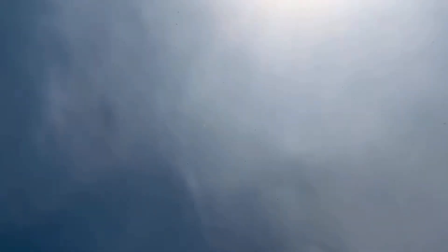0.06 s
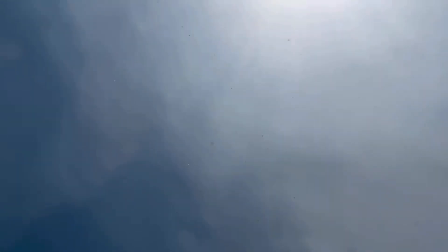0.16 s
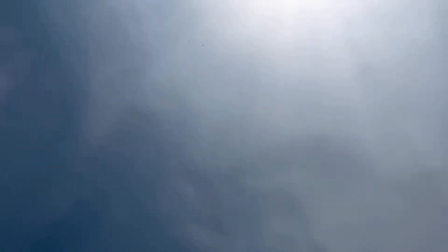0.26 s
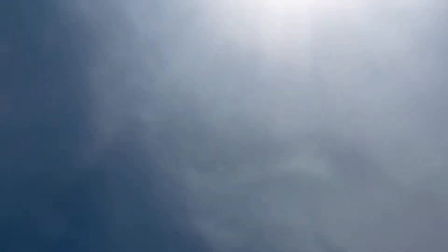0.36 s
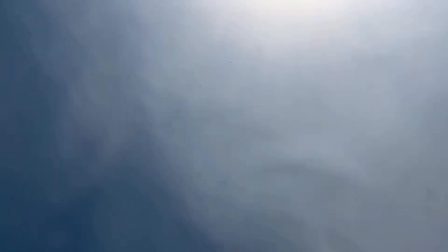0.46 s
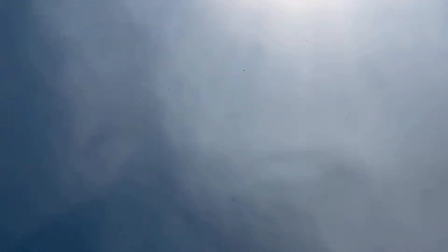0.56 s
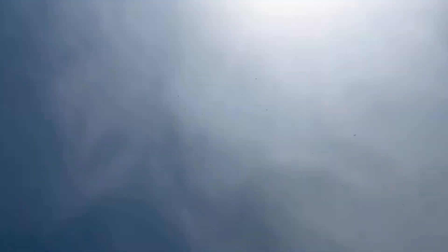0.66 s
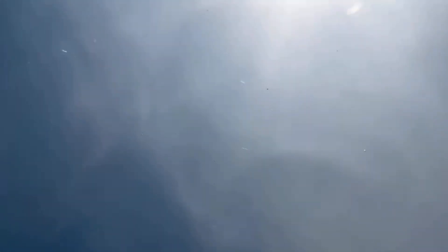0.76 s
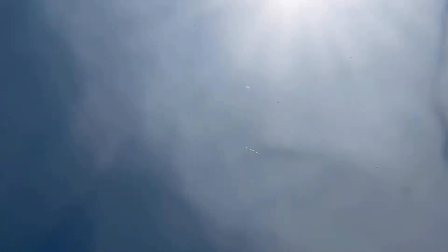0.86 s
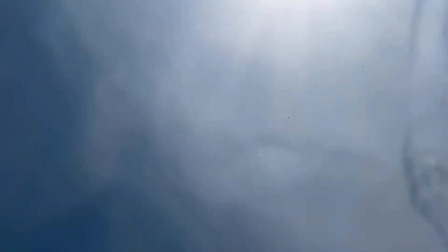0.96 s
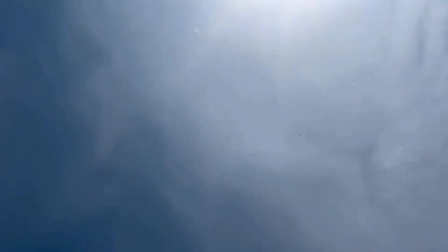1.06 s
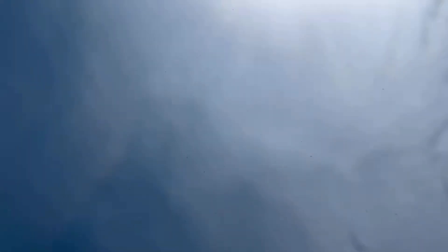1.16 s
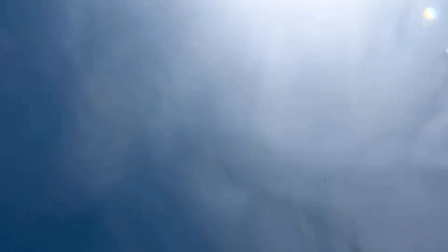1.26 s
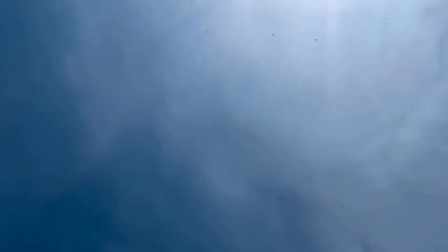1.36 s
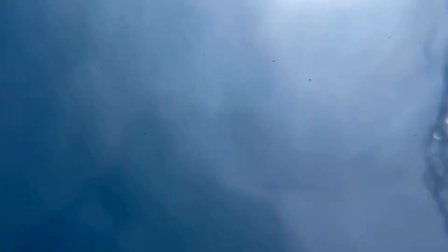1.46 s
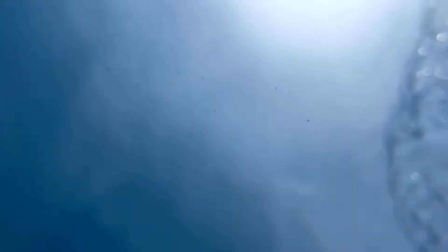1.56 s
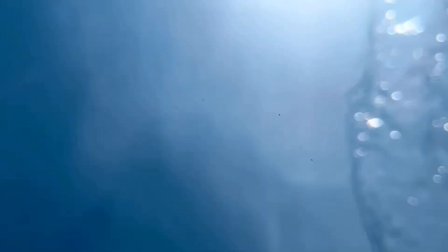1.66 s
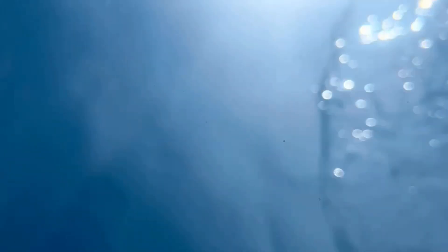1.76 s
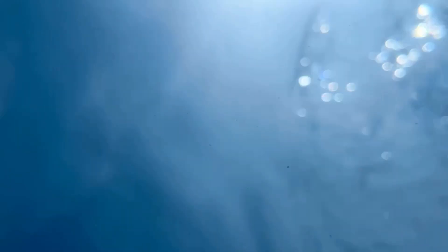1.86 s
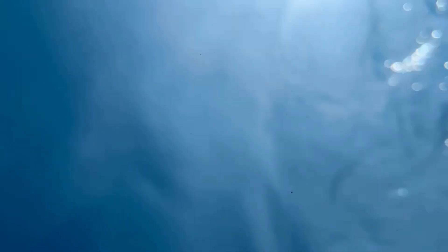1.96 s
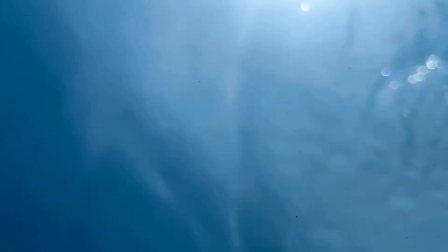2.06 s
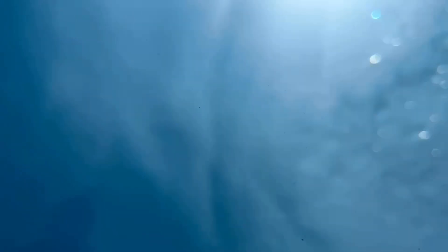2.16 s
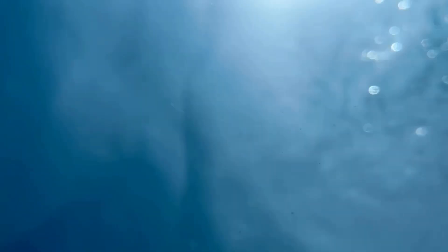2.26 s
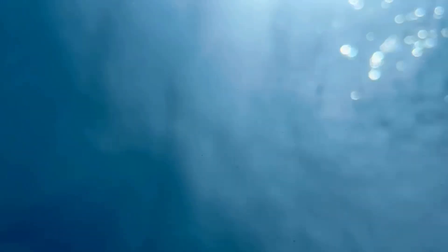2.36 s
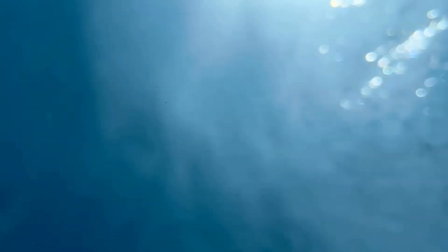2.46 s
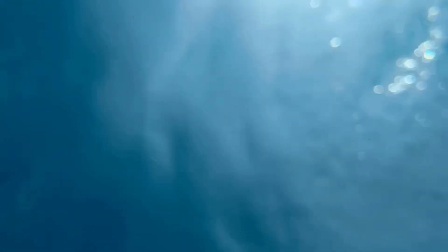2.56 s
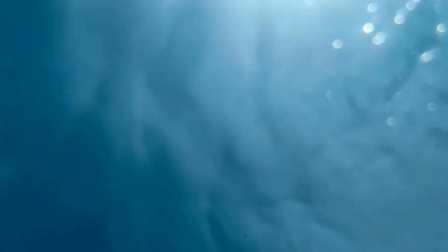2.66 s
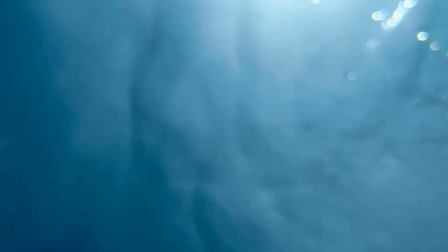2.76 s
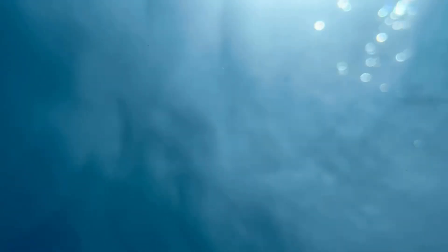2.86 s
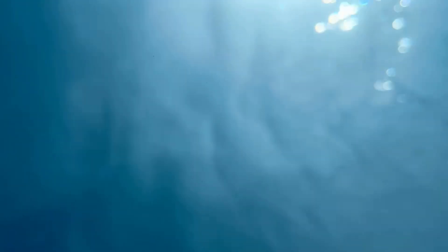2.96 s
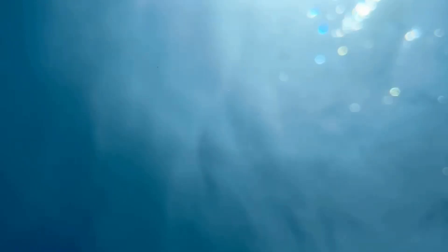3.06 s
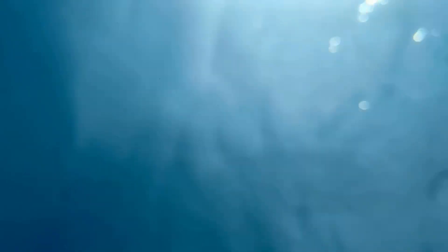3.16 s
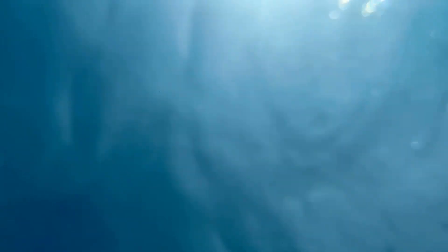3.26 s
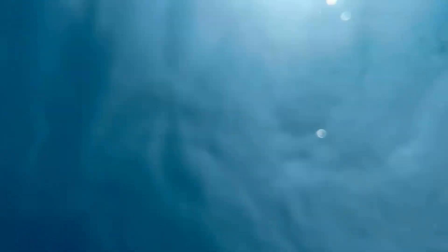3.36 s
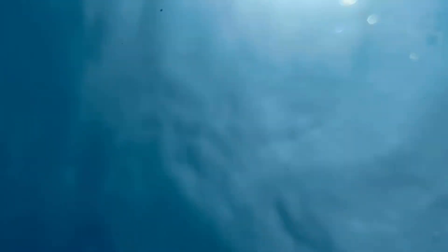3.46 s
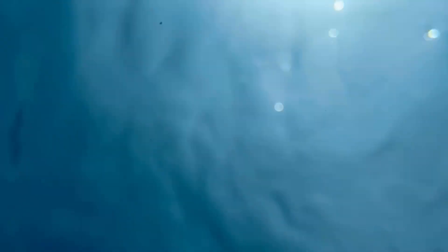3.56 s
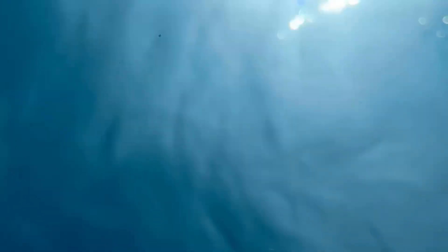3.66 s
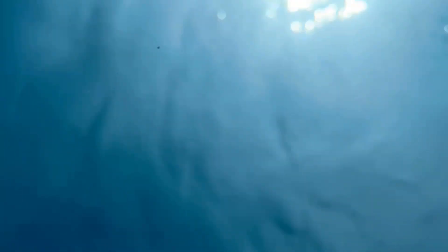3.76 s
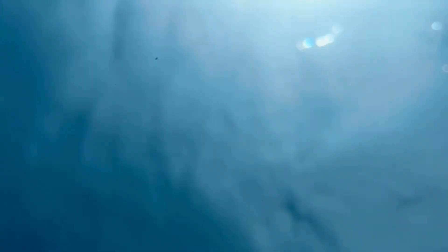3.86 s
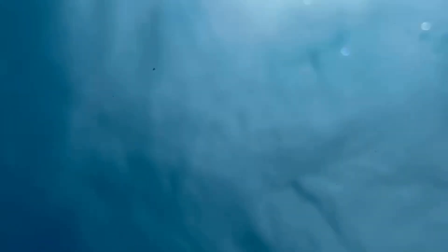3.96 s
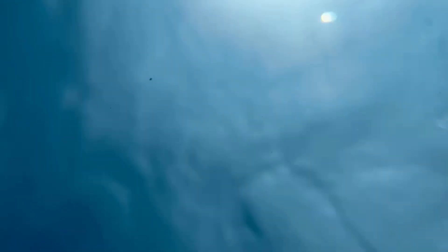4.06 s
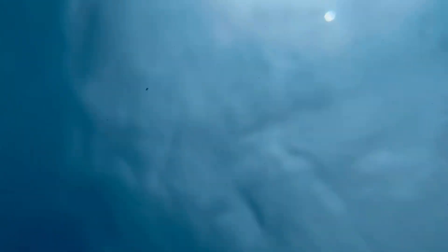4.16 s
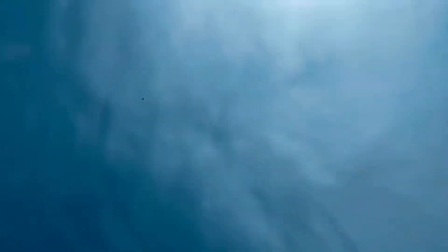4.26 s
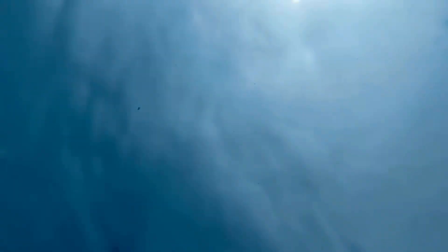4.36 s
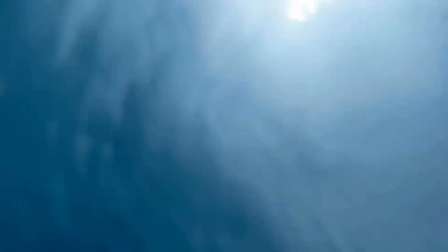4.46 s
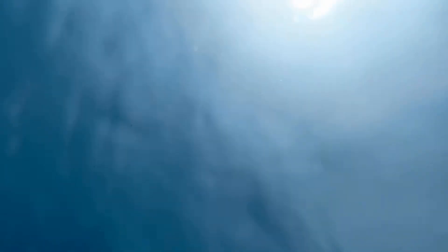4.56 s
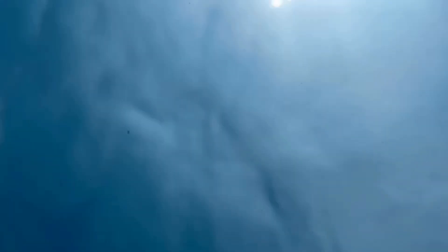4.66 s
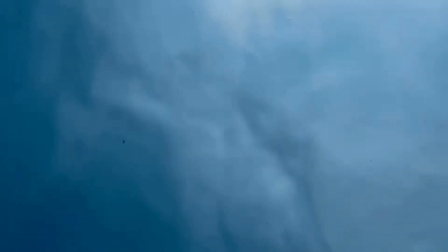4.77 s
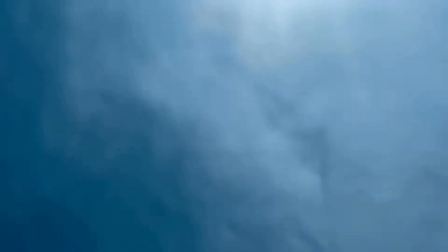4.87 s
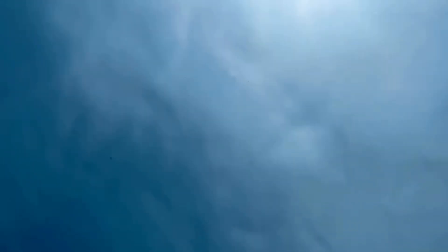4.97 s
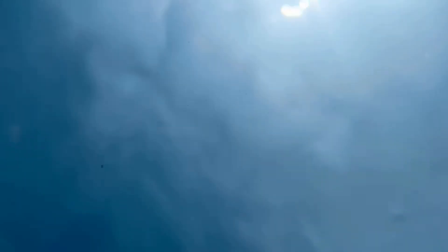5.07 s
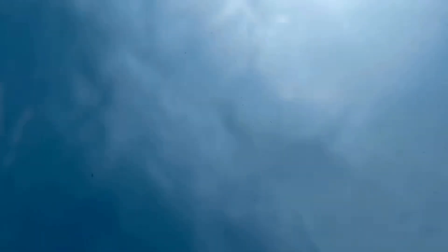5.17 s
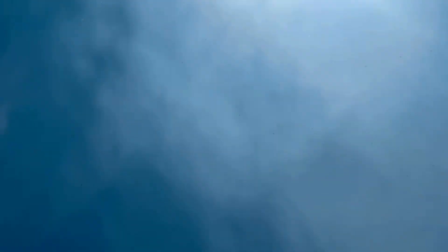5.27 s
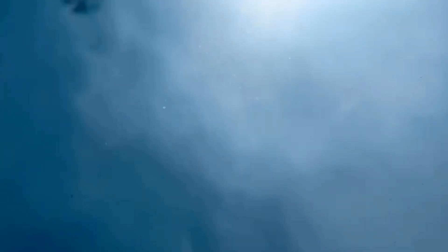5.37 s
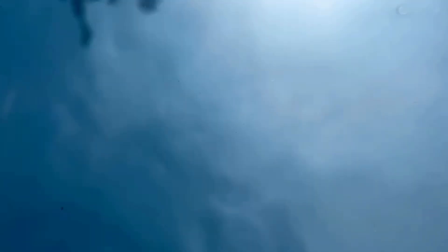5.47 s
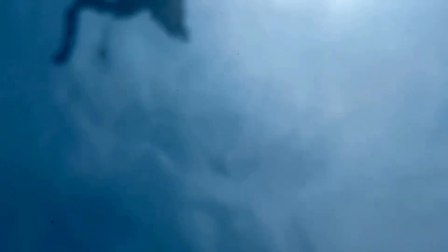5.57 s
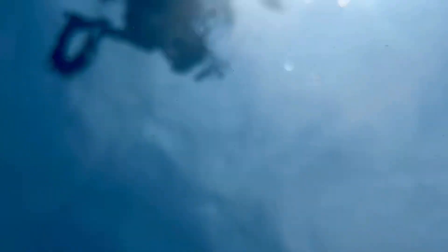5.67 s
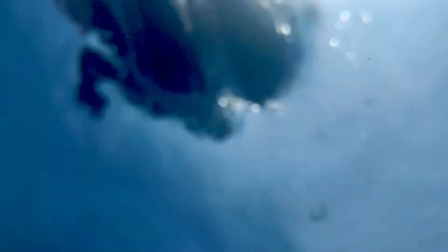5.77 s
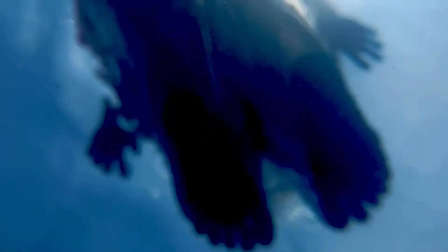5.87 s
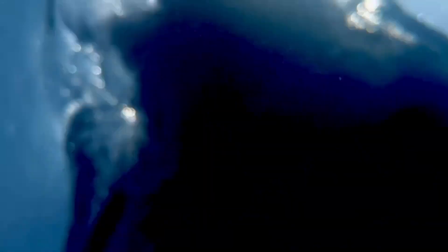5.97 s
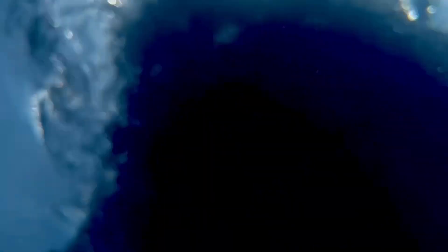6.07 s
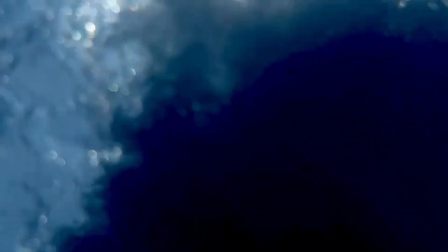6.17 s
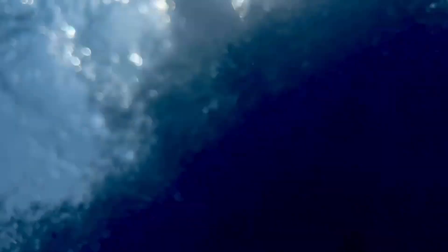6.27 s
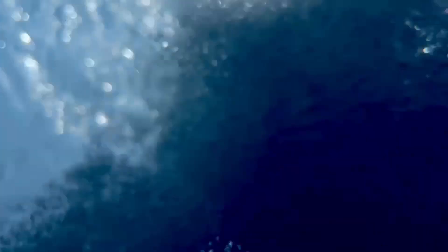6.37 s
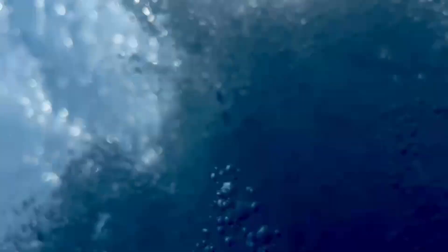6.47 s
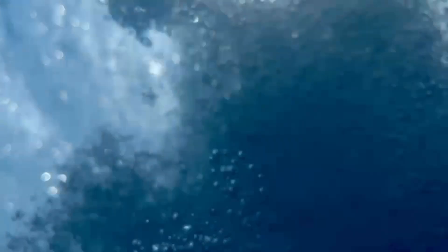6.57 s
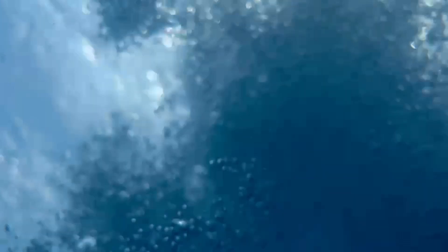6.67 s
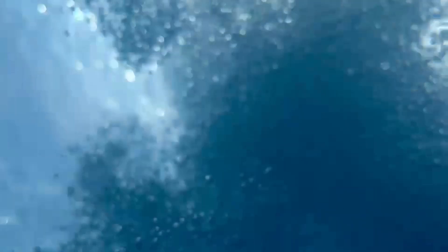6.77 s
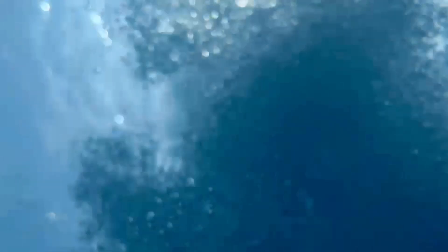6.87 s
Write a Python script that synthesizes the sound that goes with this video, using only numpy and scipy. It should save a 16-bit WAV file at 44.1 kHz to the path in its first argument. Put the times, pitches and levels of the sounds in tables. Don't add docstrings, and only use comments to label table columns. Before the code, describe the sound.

Underwater in a pool, muffled and bass-heavy, heard in stereo by a microphone inside a hard housing close to the action. From 0 to about 1.5 s a swimmer's wake rumbles and churns: deep overlapping gulps, mid-pitched gurgles, small knocks near 0.4 s, and hard dull thumps at 0.55 and 1.38 s, each briefly ducking the sound. By 1.9 s one large round gulp rings out, and the water calms. From 2.2 to 5 s a steady, very low pump hum lies under faint fizz, sparse soft bloops and tiny shell ticks. At 5.1 s a short deep gulp and knock stir it, then calm returns. At 5.73 s a plunge hits with a bright snap; crackling slaps and wet thuds cluster until 6.2 s, with hissing froth. Thick, low bubbling and gurgling roll on, gradually easing, with a few weaker slaps until the cut near 6.9 s.

```python
import sys
import numpy as np
from scipy import signal
from scipy.fft import rfft, irfft
from scipy.io import wavfile
from scipy.ndimage import uniform_filter1d, minimum_filter1d

SR = 44100
rng = np.random.default_rng(int(sys.argv[2]) if len(sys.argv) > 2 else 0)


def how_loud(loudness_db):
    steps = np.asarray(loudness_db, float) / 20
    return 10 ** steps


def generate_wav(signal):
    frames = np.transpose(np.atleast_2d(signal))
    scaled = np.clip(frames, -1, 1) * 32767
    pcm = np.round(scaled).astype(np.int16)
    wavfile.write(sys.argv[1], SR, pcm)


N = 305169

# t/s, stir above calm/dB, fineness of the bubbles/dB
STIR = [(0, 45, 4), (.42, 36, -1.5), (.8, 30.5, -2), (1.3, 35, -4.5), (1.8, 19.5, 0), (2.2, 12, 0),
        (2.72, 4, 2.5), (3.12, 7.5, 3.5), (3.45, 0, 0.5), (5.07, 0.5, 0.5), (5.15, 15.5, 0), (5.47, 0, 2),
        (5.72, 1, 1.5), (5.87, 23.5, 7), (5.94, 45, -4.5), (6.07, 35, -12.5), (6.3, 32, -20.5),
        (6.92, 24, -16.5)]
# calm level/dB, share of stir [dB/dB], share of fineness [dB/dB]
LAYERS = [
    (-38.5, 0.27, -0.65),
    (-56, 0.89, -0.44),
    (-64, 0.82, -0.49),
    (-70, 0.93, 0.3),
    (-81, 0.65, 0.88),
]
LAYER_HZ = (70, 150, 320, 520, 1200)
# f/Hz, level/dB
CLOUD_COLOUR = [(32, -16.5), (48, 0), (80, 8), (130, 6), (220, 1), (300, -3), (480, 1.5), (620, -3.5),
                (900, 1), (1550, 0.5), (1700, -14)]
# f/Hz, level/dB
WIDTH = [(60, -13.5), (150, -13.5), (380, -9.5), (950, 4.5), (2380, -7), (5980, -4.5), (15000, -7.5)]
# f/Hz, level per Hz/dB
HISS_COLOUR = [(1000, -3.5), (1500, -7.5), (1700, -10.5), (2310, -16), (3300, -13), (3700, -20),
               (4700, -22.5), (5800, -17), (6600, -28), (7600, -44.5), (13100, -40), (15600, -50.5)]
# f/Hz, level per Hz/dB
HIGH_NOISE_COLOUR = [(6900, -29.5), (7500, -18), (9300, -18.5), (10600, -6.5), (13700, 0), (14100, -13.5),
                     (15700, -17)]
# t/s, depth/dB, recovery/s
DIPS = [
    (0.555, 12, 0.083),
    (1.39, 12, 0.18),
    (5.75, 14.5, 0.011),
    (6.025, 4, 0.015),
]
# t/s, peak level/dB, f/Hz, decay/s
WAKE_POCKETS = [(-.021, -8.5, 60.2, 0.055), (0.05, -5, 114.5, 0.0084), (0.047, -6.5, 101.2, 0.23),
                (0.068, -5.5, 41.97, 0.16), (0.116, -9, 68.4, 0.062), (0.201, -14.5, 157.3, 0.11),
                (0.202, -4, 122.5, 0.06), (0.231, 4.5, 74.8, 0.026), (0.293, -11.5, 105.4, 0.07),
                (.312, -5, 129, 0.1), (0.34, -3, 88.1, 0.066), (0.46, -6.5, 101.9, 0.071),
                (0.509, 1.5, 122.4, 0.01), (0.551, -2.5, 54.7, 0.0036), (0.555, -2.5, 60.4, 0.072),
                (0.673, -9.5, 76.1, 0.32), (0.775, -6.5, 120, 0.014), (.798, -1, 92.5, 0.047),
                (0.853, -5.5, 54.4, 0.053), (0.921, -16.5, 78.8, .06), (.965, -4, 74, 0.064),
                (1.062, -2, 82.6, 0.03), (1.137, -18.5, 66.7, 0.053), (1.149, -1, 88.8, 0.036),
                (1.225, -3, 85, 0.02), (1.284, -9.5, 63.8, 0.055), (1.288, -28, 83.7, 0.084),
                (1.363, -1.5, 126, 0.0066), (1.373, -2.5, 89.5, 0.027), (1.403, -6, 112, 0.029)]
# t/s, peak level/dB, f/Hz, glide/(octaves per s), decay/s
GULPS = [(1.863, 0, 70.55, 0.5, 0.11), (1.989, -25, 63, 2.5, 0.079), (2.074, -12.5, 97.2, 0.5, 0.046),
         (2.212, -22, 117.8, 3.5, 0.049), (2.326, -12.5, 120.5, 3, 0.028), (2.429, -23.5, 132, 2, 0.019),
         (2.909, -44, 108, -4, 0.01), (3.912, -21, 104.5, 1.5, 0.04), (4.022, -20, 75.4, 5.5, 0.035),
         (4.07, -24.5, 95, 4.5, 0.025), (4.793, -18.5, 59.2, 2, 0.0099), (5.099, -7.5, 177.8, -2.5, 0.015),
         (5.11, 4, 87.1, -2.5, 0.024), (5.139, -9.5, 58.07, -2, 0.19), (5.148, -17, 40.76, 5.5, 0.17),
         (5.23, -5, 70.9, -2.5, 0.11), (5.378, -11, 60, 6, 0.01), (5.519, -21.5, 60.4, 0.5, 0.066)]
# t/s, peak level/dB, f/Hz, decay/s
PLUNGE_POCKETS = [(5.736, -28.5, 148, 0.011), (5.7325, -0.5, 80.5, 0.032), (5.755, -7, 42.1, 0.028),
                  (5.846, -8.5, 140, 0.008), (5.85, -5, 84.3, 0.023), (5.922, -4.5, 109, 0.051),
                  (5.95, -1, 61.5, 0.12), (5.979, -8, 170, 0.018), (5.995, -14.5, 102.6, 0.035),
                  (6.04, -1.5, 92, 0.051), (6.07, -2.5, 55.6, 0.1), (6.177, -3, 65.3, 0.032),
                  (6.186, -11, 101, 0.24), (6.204, -4.5, 112.4, 0.08), (6.252, -7, 92.7, 0.098),
                  (6.289, -4, 78.4, 0.06), (6.354, -5.5, 85.5, 0.063), (6.375, -3, 87.6, 0.054),
                  (6.393, -11.5, 111.7, 0.063), (6.418, -12, 114.6, 0.067), (6.446, -3, 74, 0.076),
                  (6.46, -4.5, 80, 0.013), (6.519, -9, 78, 0.059), (6.591, -3.5, 99.9, 0.069),
                  (6.664, -18.5, 75, 0.043), (6.735, -5.5, 86.8, 0.027), (6.788, 4.5, 78, 0.017),
                  (6.868, -8.5, 86.5, 0.022)]
# t/s, peak level/dB, f/Hz, glide/(octaves per s), decay/s
BUBBLES = [(.734, -22.5, 444, 3, 0.0081), (1.255, -24.5, 440, -4, 0.01), (1.832, -31, 458, 1.8, 0.0079),
           (1.945, -40.5, 517, -3.5, 0.023), (2.48, -44, 496, -2, 0.0084), (2.773, -44, 244, -1.5, 0.031),
           (2.773, -46.5, 480, 1.2, 0.026), (2.976, -39, 425, -4.5, 0.021), (2.998, -49, 383, 5, .018),
           (3.044, -45.5, 409, 3.5, .007), (3.094, -34, 384, -1.3, 0.022),
           (3.179, -45.5, 616, -1.5, 0.0057), (3.18, -48, 453.5, 2.5, 0.037),
           (3.514, -58.5, 294, 6.5, 0.013), (3.974, -54, 635, -1, 0.017), (4.188, -35, 380, 5, 0.028),
           (4.221, -53, 689, 4.5, 0.0078), (4.493, -57.5, 458, 9.5, 0.015), (4.572, -56.5, 488, -3.5, 0.01),
           (4.66, -54.5, 476, -1, 0.012), (4.899, -52, 331, -9.5, 0.0081), (5.339, -54, 552, 2, .015),
           (5.7348, -6.5, 537, -21.5, 0.00092)]
# t/s, peak level/dB, f/Hz
GURGLES = [(.087, -32, 560), (.137, -24.5, 544), (.18, -28.5, 475), (.217, -23, 495), (.282, -29, 439),
           (.318, -29.5, 463), (.337, -62, 13100), (.343, -24, 427), (.554, -63.5, 13070),
           (1.169, -58.5, 13160), (5.733, -58.5, 13100), (.855, -39, 559), (.992, -30, 486),
           (1.059, -30.5, 430), (1.112, -36, 500), (6.221, -30.5, 285), (6.263, -38, 560),
           (6.339, -37, 557), (6.582, -30, 250), (6.617, -59.5, 1450), (6.655, -29, 266), (6.74, -52, 1487),
           (6.822, -59, 1540), (6.866, -55.5, 1810)]
# t/s, peak level/dB, lower f/Hz, upper ring level/dB
TICKS = [(2.3496, -70, 3000, -79.5), (2.382, -64.5, 3000, -83), (2.5227, -66, 3000, -81),
         (2.6005, -72, 3000, -70.5), (2.8, -73, 3000, -79), (2.8374, -73.5, 3000, -73),
         (2.8814, -71, 3000, -83), (3.1807, -65, 3000, -77.5), (3.237, -70.5, 3000, -80),
         (3.3164, -75, 3000, -70), (3.3967, -73.5, 3000, -81), (3.479, -73, 3000, -79.5),
         (3.7439, -64, 3000, -86.5), (3.9594, -74.5, 3000, -82), (4.2847, -71, 3000, -68),
         (4.3849, -71, 3000, -80), (4.4902, -66, 3000, -90), (4.8449, -74, 3000, -78.5),
         (4.9636, -69.5, 3000, -78)]
# t/s, peak level/dB, lower f/Hz, upper ring level/dB
CLINKS = [
    (1.995, -61.5, 3300, -70.5),
    (5.732, -47.5, 3000, -49),
    (5.7338, -44, 3000, -33.5),
    (5.737, -47, 3000, -44.5),
    (5.85, -35.5, 2080, -61),
]
# f/Hz, bandwidth/Hz, level/dB
SHELL_MODES = [(1270, 6900, 6.5), (3000, 2100, 3.5), (5600, 940, -13), (13170, 2500, -24)]
# t/s, thud level/dB, crackle level/dB, start f/Hz, bend/s
KNOCKS = [(.256, -27, -59, 4160, 0.0016), (0.3738, -26.5, -49, 4950, 0.00096),
          (.377, -30.5, -48.5, 4000, .002), (0.5448, -40, -57.5, 3800, 0.0025),
          (0.555, -8, -43, 6080, 0.012), (.832, -25, -63.5, 3000, 0.0097),
          (1.3762, -8, -35.5, 8820, 0.0042), (5.102, -25.5, -69, 249, 0.0099),
          (5.1204, -15.5, -44.5, 6700, 0.0077), (5.8503, -4, -45.5, 486, 0.0055),
          (6.157, -33, -59.5, 3000, 0.0011), (6.17, -23, -60.5, 3000, 0.0084)]
# t/s, thud level/dB, crackle level/dB, start f/Hz
SPLASH = [(5.733, -7, -38.5, 475.5), (5.794, -22.5, -52.5, 1417), (5.93, -6, -36, 1933),
          (5.9404, -14.5, -42, 2514), (5.947, -13.5, -51, 1480), (5.972, -13.5, -46, 1977),
          (5.981, -3.5, -46, 1486), (5.99, -10, -47.5, 1512), (6.003, -6, -37, 1862),
          (6.016, -13, -50.5, 1122), (6.025, -17, -54.5, 1210), (6.12, -24.5, -63, 1157),
          (6.133, -20.5, -61, 1413), (6.184, -17.5, -52.5, 2457), (6.189, -24.5, -57.5, 1800),
          (6.395, -27.5, -75, 1166), (6.409, -33.5, -74, 1190), (6.461, -26, -75.5, 1167),
          (6.804, -33, -73, 2020), (6.868, -41, -80, 1500)]
# t/s, crackle level/dB, swell/s
FLURRIES = [
    (.325, -56.5, .025),
    (1.145, -59.5, .025),
    (5.885, -55.5, .028),
]


def evened(x):
    return x / np.sqrt(np.mean(x ** 2) + 1e-20)


def read(points, hz):
    f, value = np.transpose(points)
    return np.interp(np.log(hz + 1), np.log(f + 1), value)


def add(mix, s, sound):
    at = round(s * SR)
    part = mix[..., max(at, 0):][..., :sound.shape[-1] + min(at, 0)]
    part += sound[..., max(-at, 0):][..., :part.shape[-1]]


def ports(mid, side):
    return np.array([mid + side, mid - side]) * how_loud(np.array([[.5], [-.5]]))


def dip_db(t):
    total = 0
    for s, depth_db, back_s in DIPS:
        corners = np.cumsum([0, 0.026, 0.085, back_s])
        total = total - depth_db * np.interp(t - s, corners, [0, 1, 1, 0])
    return total


def layer_db(t):
    s, stir, fine = np.transpose(STIR)
    stir, fine = np.interp(t, s, stir), np.interp(t, s, fine)
    return np.array([calm + a * stir + b * fine for calm, a, b in LAYERS])


def self_noise():
    colour = how_loud(read(HIGH_NOISE_COLOUR, np.fft.rfftfreq(N + 1, 1 / SR)))
    mid, side = irfft(rfft(rng.standard_normal((2, N + 1))) * colour)[:, :N]
    s, _, fine = np.transpose(STIR)
    fine = np.interp(np.arange(N) / SR, s, fine)
    drift = evened(uniform_filter1d(rng.standard_normal(N), size=3000))
    return how_loud(-93.5 + 1.5 * drift + .7 * fine) * evened(ports(mid, .5 * side))


def pump(hz=57.73, level_db=-21.5, overtone_db=-27.5, stir_share=0.044):
    t = np.arange(N) / SR
    turn = 2 * np.pi * hz * t
    tone = np.cos(turn + 0.6) + how_loud(overtone_db) * np.cos(2 * turn)
    stir = np.interp(t, *np.transpose(STIR)[:2])
    return np.sqrt(2) * how_loud(level_db - stir_share * np.maximum(stir - 12, 0) + dip_db(t)) * tone


def hiss(level_db=-77, follow=0.78, calm_db=-80):
    frames, hz = N // 128 + 5, np.fft.rfftfreq(512, 1 / SR)
    real, imag = rng.standard_normal((2, frames, 2, 257)).transpose(0, 2, 3, 1)
    flicker = evened(uniform_filter1d(rng.standard_normal(frames), size=9))
    patches = uniform_filter1d(rng.standard_normal((257, frames)), size=7, axis=0)
    patches = evened(uniform_filter1d(patches, size=14))
    colour = read(HISS_COLOUR, hz) - 60 * (hz < 900)
    z = (real + 1j * imag) * how_loud(colour[:, None] + 1.5 * flicker + 2.2 * patches)
    z[1] *= how_loud(read(WIDTH, hz))[:, None]
    mid, side = signal.istft(z, nperseg=512, noverlap=384)[1][:, :N]
    t = np.arange(N) / SR
    level = how_loud(level_db + follow * (layer_db(t)[-1] - calm_db) + 0.87 * dip_db(t))
    return level * evened(ports(mid, side))


def ring(db, hz, glide, rise, decay, length=0.48, per_s=SR):
    t = np.arange(round(length * per_s)) / per_s
    shape = np.sin(np.pi / 2 * np.minimum(t / rise, 1)) ** 2 * np.exp(-np.maximum(t - rise, 0) / decay)
    shape *= np.minimum(4 - 4 * t / length, 1)
    pitch = hz * 2 ** (glide * np.minimum(t, .2))
    return how_loud(db) * shape * np.sin(2 * np.pi * np.cumsum(pitch) / per_s)


def churn(cycles=7.5, uneven_db=5.5, surge_db=2.5, level_db=-10):
    per_s, count = SR / 8, N // 8 + 1
    t, out = np.arange(count) / per_s, np.zeros((2, count))
    levels = layer_db(t)
    surge = how_loud(surge_db * evened(uniform_filter1d(rng.standard_normal(count), size=160)))
    crowd = 1 + np.clip((levels[3] + 61) / 7, 0, 4)
    for hz in np.geomspace(32, 1680, num=44):
        longer = 1 + 0.74 * np.exp(-(np.log2(hz / 533) / 0.25) ** 2)
        decay = cycles / hz * (hz / 400) ** .35 * longer
        born = rng.random((2, count)) < crowd / decay / per_s
        uneven = how_loud(uneven_db * np.minimum(rng.exponential(1, (2, count)), 4))
        sign = rng.choice([-1, 1], (2, count))
        size = born * surge / np.sqrt(crowd) * uneven * sign
        bubble = ring(0, hz, .05 / decay, decay / 4, decay, 6 * decay, per_s)
        mid, side = (evened(signal.oaconvolve(train, bubble)[:count]) for train in size)
        shares = [np.interp(np.log(hz), np.log(LAYER_HZ), one) for one in np.eye(len(levels))]
        db = np.array(shares) @ levels
        db += 4.5 * np.exp(-(np.log2(hz / 580) / 0.16) ** 2) * (t < 0.47)
        out += how_loud(db + read(CLOUD_COLOUR, hz) + level_db) * ports(mid, side * how_loud(read(WIDTH, hz)))
    out *= how_loud(1.18 * dip_db(t))
    return signal.resample_poly(out, 8, 1, axis=1)[:, :N]


def rings(rows, spread):
    out = np.zeros((2, N))
    for (s, *row), lean in zip(rows, 2 * rng.random(len(rows)) - 1):
        sound = ring(*row)
        add(out, s, ports(sound, spread * lean * sound))
    return out


def shell_ticks(tick_s=.002, upper_hz=5800):
    rows = []
    for s, low_db, low_hz, up_db in TICKS + CLINKS:
        for db, hz in ((low_db, low_hz), (up_db, upper_hz)):
            rows.append((s, db, hz, 0, tick_s / 2, tick_s))
    return rows


def small_bubbles(rise_s=0.008, gurgle_cycles=2.8):
    rows = [(*row, rise_s, decay) for *row, decay in BUBBLES]
    return rows + [(s, db, hz, 1.5, rise_s / 2, gurgle_cycles / hz) for s, db, hz in GURGLES]


def air_pockets(rise_s=0.012, settle_hz=78, settle_per_s=5, most=2.7):
    rows = []
    for s, db, hz, decay in WAKE_POCKETS + PLUNGE_POCKETS:
        glide = np.clip(settle_per_s * np.log2(settle_hz / hz), -most, most)
        rows.append((s, db, hz, glide, rise_s, decay))
    return rows + [(*row, rise_s, decay) for *row, decay in GULPS]


def slap(thud_db, crackle_db, start_hz, bend, length, echo=0.64):
    t = np.arange(2600) / SR
    late = np.maximum(t - length, 0)
    ragged = min(length / .0015, 1)

    stretch = .7 + (0.023 + 0.044 * ragged) * (2 * rng.random((2, 1)) - 1)
    stretch = stretch + .6 * (1 - ragged)
    hz = 40 + 1 / (1 / start_hz + stretch * late)
    shape = (late / bend) ** 0.56 * np.exp(-late / bend) * (1 - np.exp(-3.0 * start_hz * late))
    wave = how_loud(thud_db + 6.0) * shape * np.sin(2 * np.pi * np.cumsum(hz * (late > 0), axis=1) / SR)
    wall = rng.integers(50, 130)
    wave[:, wall:] -= echo * ragged * wave[:, :-wall]

    envelope = np.exp(-late / (0.81 * length) - (length - t + late) / (0.87 * length))
    grit = rng.standard_normal((2, len(t))) ** 3 * envelope
    grit[1] *= .35
    shell = sum(how_loud(db) * np.exp(-np.pi * w * t) * np.sin(2 * np.pi * f * t) for f, w, db in SHELL_MODES)
    crackle = signal.fftconvolve(ports(*grit), shell[None], axes=1)[:, :len(t)]
    if echo:
        top_hz = np.clip(9000 * 2 ** ((crackle_db + 37) / 13.5), 4000, 15000)
        crackle = signal.lfilter(*signal.butter(2, top_hz, fs=SR), crackle)
    crackle *= how_loud(crackle_db + 10) / abs(crackle).max()

    band = signal.butter(2, [300, 660], 'band', fs=SR, output='sos')
    rock = signal.sosfilt(band, rng.standard_normal(len(t)))
    rock *= t * np.exp(-abs(t - length) / 0.0032)
    rock *= ragged * how_loud(thud_db - 10) / abs(rock).max()

    fade = np.cos(np.pi / 2 * np.clip(2 * t / t[-1] - 1, 0, 1)) ** 2
    return fade * (wave + crackle + ports(0.38 * rock, rock))


def scene():
    water = pump() + churn() + hiss() + self_noise()
    water += rings(air_pockets(), .11) + rings(small_bubbles() + shell_ticks(), .4)
    bend_s = 0.0064
    for s, thud_db, crackle_db, hz, bend in KNOCKS:
        add(water, s, slap(thud_db, crackle_db, hz, bend, 0.89 / max(hz, 600), echo=0))
    for s, thud_db, crackle_db, hz in SPLASH:
        bend = bend_s * max(0.5 - 0.23 * thud_db, .15)
        add(water, s, slap(thud_db, crackle_db, hz, bend, 2 / hz))
    for s, crackle_db, swell in FLURRIES:
        add(water, s, slap(-90, crackle_db, 1000, bend_s, swell, echo=0))
    return water


def band_limit(x):
    return signal.sosfilt(signal.butter(12, 15710, fs=SR, output="sos"), x)


def record(dry):
    room = minimum_filter1d(np.minimum(.94 / (abs(dry).max(0) + 1e-9), 1), size=801)
    held = dry * uniform_filter1d(room, size=801)
    held *= np.minimum(np.arange(N)[::-1] / 300, 1)
    loud = uniform_filter1d(abs(held), size=900, axis=1) ** 0.34
    clock_hz = 9600
    mirror = how_loud(-59.5) * loud * held * np.cos(2 * np.pi * clock_hz * np.arange(N) / SR)
    return band_limit(held + mirror)


dry = scene()
out = record(dry)
generate_wav(out)
```